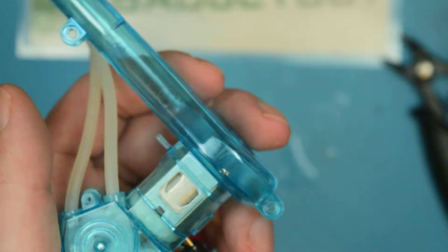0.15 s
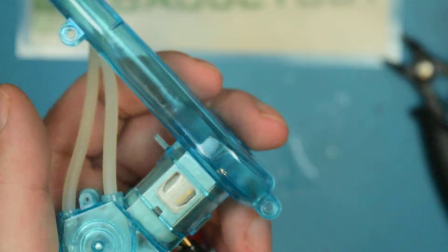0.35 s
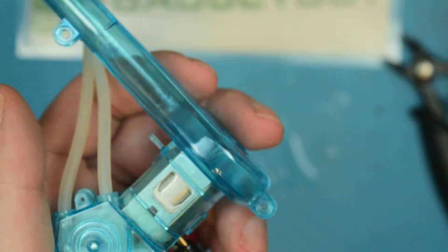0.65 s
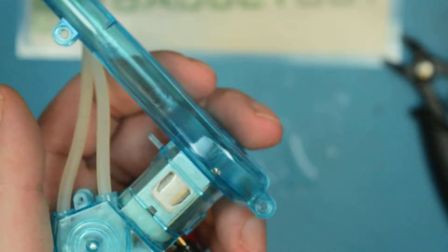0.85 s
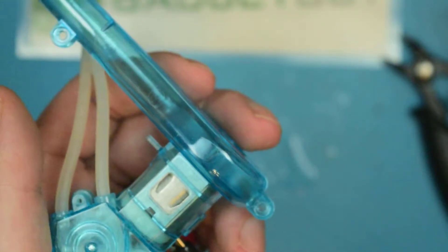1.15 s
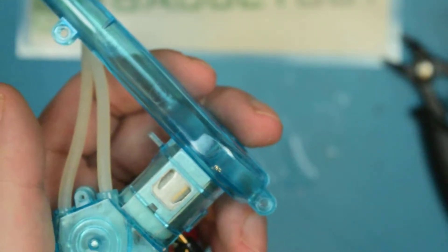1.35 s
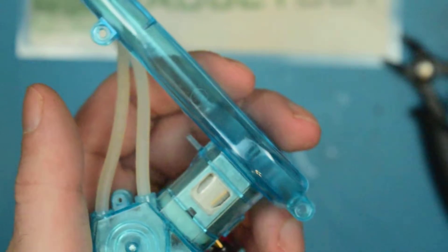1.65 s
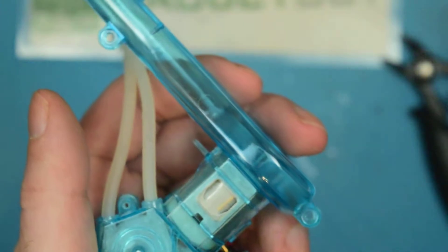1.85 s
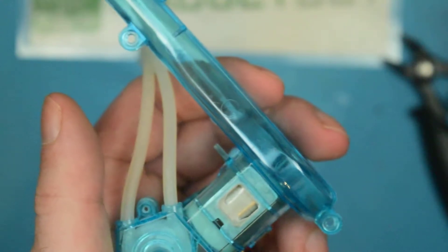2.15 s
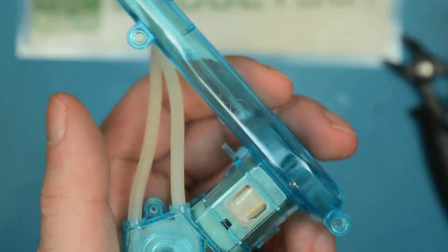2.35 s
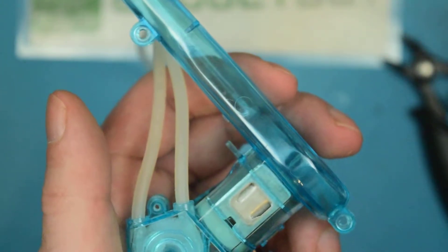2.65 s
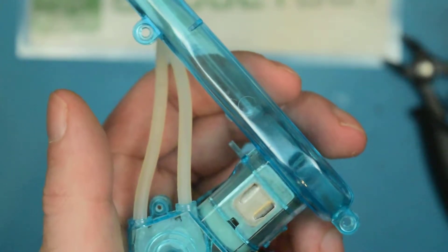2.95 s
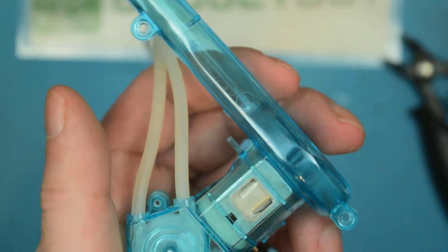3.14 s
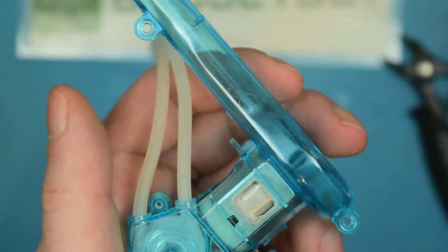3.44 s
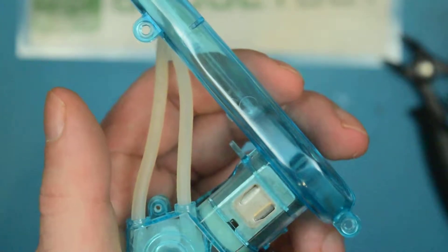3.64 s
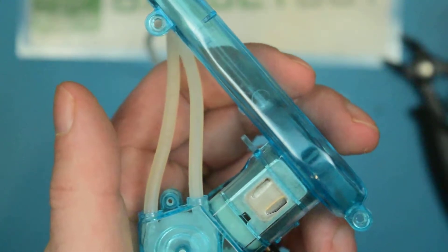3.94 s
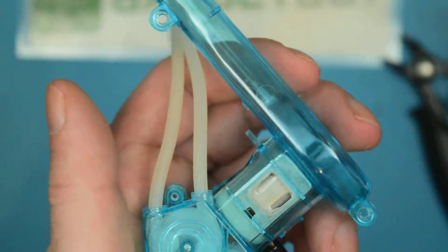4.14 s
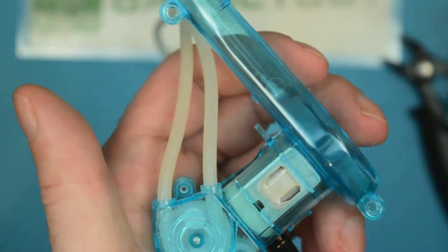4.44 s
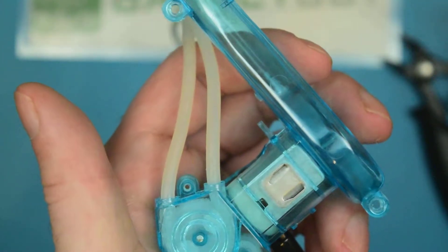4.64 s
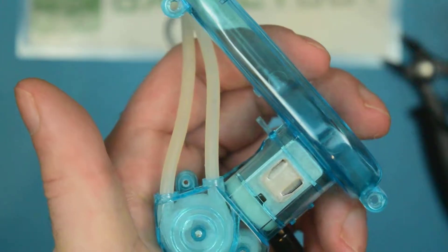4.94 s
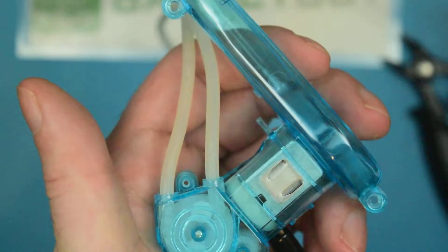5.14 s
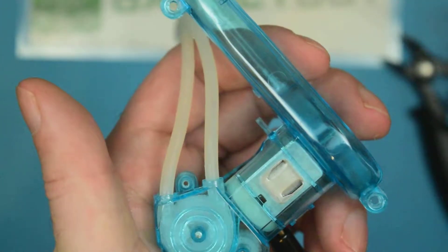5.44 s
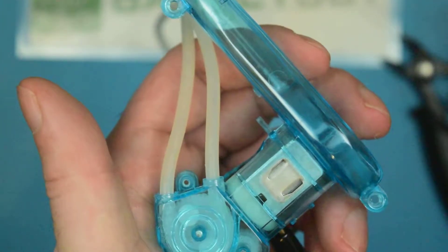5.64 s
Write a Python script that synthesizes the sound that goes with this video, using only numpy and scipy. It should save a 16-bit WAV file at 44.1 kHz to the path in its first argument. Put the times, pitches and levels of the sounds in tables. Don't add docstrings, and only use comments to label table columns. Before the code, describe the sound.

A tiny geared pump motor runs in a hand close to the microphone. It starts slow, spins up quickly, then its whine wavers up and down about once every second or less. Gritty plastic rattle, rapid ticking and bright brush hiss surround it. It runs faster and higher near the end. A faint bench bump comes late, over quiet room rumble in a small, dry workspace.

```python
import sys
import numpy as np
from scipy import signal
from scipy.fft import rfft, irfft, next_fast_len
from scipy.io import wavfile
from scipy.ndimage import uniform_filter1d, map_coordinates

SR = 44100
rng = np.random.default_rng(int(sys.argv[2]) if len(sys.argv) > 2 else 0)


def master_out(mix):
    frames = np.transpose(np.atleast_2d(mix))
    ceiling = np.clip(frames, -1, 1)
    pcm = np.round(ceiling * 32767).astype(np.int16)
    wavfile.write(sys.argv[1], SR, pcm)


def attenuation_scalar(level_db):
    decades = np.asarray(level_db, float) / 20
    return 10 ** decades


N = 255339
T = np.arange(N) / SR

# f/Hz, level/dB [per Hz]
ROOM_RUMBLE = [(15, -64), (25, -38), (46, -10), (69, -5.5), (86, -8.5), (113, -7.5), (257, -3.5), (290, -4),
               (316, -4.5), (945, -12), (1500, -9.5), (1950, -26), (3300, -120)]
# f/Hz, level/dB [rms]
ROOM_HUM = [(59.2, -81.5), (118.4, -79), (161.5, -78.5), (285.3, -75.5)]
# t/s, peak level/dB
BENCH_BUMP = [
    (5.228, -42.5),
    (5.242, -45),
    (5.254, -53),
    (5.27, -49),
]
# f/Hz, width/Hz, level/dB
BENCH_MODES = [(134, 68, -7), (332, 130, -2.5), (618, 70, 0.5), (1090, 290, -9.5)]
# delay/ms, level/dB
REFLECTIONS = [(1.9, -19.5), (3.1, -28), (4.6, -27), (7.3, -14.5), (11, -12.5)]
# middle t/s, length/s, level/dB
LID_CHATTER = [
    (4.84, .07, -55),
    (5.21, 0.092, -48.5),
    (5.67, .05, -51),
]
# f/Hz, width/Hz, level/dB
LID_MODES = [(5850, 350, 0.5), (6560, 500, -1.5), (7100, 300, -6)]
# f/Hz, level/dB [per Hz]
BRUSH_HISS = [(4120, -18), (7000, -4.5), (7530, -6), (8440, -8), (9360, -8.5), (10200, -7.5), (12000, -12),
              (13800, -13), (15600, -15)]
# f/Hz, width/Hz, level/dB
CAN_MODES = [(7320, 190, 11.5), (8130, 130, -8), (8900, 120, -2.5), (10110, 350, 6), (10470, 170, 4.5),
             (13200, 200, 2), (13600, 180, 4.5)]
# t/s, level/dB
CAN_GRIP = [(0, -8), (.3, -2), (1.4, -2.5), (2.3, -4.5), (2.6, -11), (4.5, -6.5), (4.9, -8), (5.3, -1.5),
            (5.5, -11), (5.79, -3)]
# t/s, peak level/dB
KNOCKS = [(0.1411, -43), (0.3495, -37), (0.6792, -37), (0.8102, -26), (0.839, -23.5), (0.869, -25),
          (0.8994, -37), (0.93, -30), (1.043, -32), (1.2506, -38), (1.381, -29), (1.4426, -35),
          (1.838, -40), (1.93, -40), (2.17, -44), (2.45, -25), (2.4783, -32.5), (2.5383, -35), (2.567, -33),
          (2.5958, -29.5), (2.6529, -33), (2.924, -41), (3.142, -41), (3.691, -29), (4.288, -29),
          (4.68, -49), (4.8362, -31), (5.203, -46), (5.2447, -37), (5.669, -33)]
# f/Hz, width/Hz, level/dB
KNOCK_MODES = [(2730, 410, 6), (4266, 110, 16.5), (4950, 300, 7.5), (5350, 230, -12), (6285, 420, -46)]
# f/Hz, width/Hz, level/dB
FLAW_MODES = [(4215, 70, 4), (4850, 70, -3), (5450, 80, -14)]
# t/s, level/dB
FLAW_BITE = [(0, -85), (.15, -52.5), (.9, -50.5), (1.0, -57), (1.1, -49.5), (1.35, -49.5), (1.55, -73),
             (1.88, -64), (1.95, -53), (2.68, -54), (2.8, -70), (2.95, -56), (3.3, -55), (3.45, -65),
             (4.0, -68), (4.2, -52), (4.5, -70), (5.79, -66)]
# f/Hz, width/Hz, level/dB
LOW_MODES = [(1728, 164, 0.5), (2050, 202, 2.5), (2426, 99, -2.5), (2985, 810, -1), (3320, 1020, -3.5)]
# f/Hz, width/Hz, level/dB
HIGH_MODES = [(3580, 400, -5.5), (4150, 750, -2.5), (4950, 406, 0), (5140, 105, 1.5), (5493, 163, -3.5),
              (5970, 340, -5.5), (6310, 225, -4), (6756, 380, -8.5), (8475, 790, -13)]
# t/s, effort level/dB, damping/dB
MOTOR_EFFORT = [(0, -68, -1.5), (.16, -50, -2.5), (.32, -44.5, 1.5), (.75, -45.5, -0.5), (1.02, -48, 0.5),
                (1.34, -46, -2), (1.72, -49, -2), (1.87, -49.5, 0.5), (1.94, -46.5, -0.5), (2.6, -47, 1),
                (3.15, -45.5, -0.5), (3.45, -48.5, 1.5), (3.56, -46, 1), (4.42, -47, 0.5),
                (4.84, -41.5, 0.5), (5.05, -43.5, 6), (5.35, -44, 0), (5.72, -43.5, 3)]
# phase [0 slowest, 1 free, 2 load returns, 3 slowest], low level/dB, high level/dB
SHELL_CYCLE = [(0, -5.5, -5.5), (.5, -6.5, -3), (1, -6, -4), (2, -4.5, -2.5), (2.3, -3.5, -4.5),
               (3, -4.5, -5)]
# slowest t/s, slowest tooth rate f/Hz, free from t/s, free tooth rate f/Hz, load returns t/s
PUMP_STROKES = [(0, 600, .35, 1300, .51), (.916, 975, 1.09, 1135, 1.296), (1.454, 928, 1.558, 936, 1.664),
                (1.69, 930, 1.894, 1208, 2.1), (2.52, 958, 2.726, 1166, 2.904),
                (3.24, 962, 3.502, 1204, 3.684), (4.118, 922, 4.47, 1239, 4.56),
                (4.67, 1181, 5.02, 1582, 5.135), (5.495, 1204, 5.69, 1428, 5.8)]
# tooth rate f/Hz, first level/dB, second level/dB, third level/dB
MESH_RADIATION = [(530, -101, -96, -85), (800, -92, -76, -72), (940, -89, -52, -53), (1030, -86, -49, -53),
                  (1080, -85, -57, -55), (1120, -84, -63, -58), (1185, -76, -62, -56),
                  (1205, -73, -61, -52), (1320, -62, -61, -52), (1430, -64, -57, -52),
                  (1500, -60, -66, -54), (1580, -55, -68, -49)]
# stroke phase, second level/dB, third level/dB
TOOTH_SINGING = [(0, -7, 1), (.5, -8, -1), (.85, -5, -7), (1, -3, 0), (2, -3, 0), (2.15, 0, -4),
                 (2.45, 2, -1), (3, -7, 1)]
# t/s, level/dB
TOOTH_PRESSURE = [(0, -10), (.2, -7), (.3, 7), (.4, 0.5), (.62, -8), (.8, -1), (1.15, 0), (1.35, -2.5),
                  (1.55, 4.5), (1.68, -4.5), (2.1, -1), (2.85, 0), (3.2, 0), (4.1, -1), (4.35, -2.5),
                  (4.8, 0.5), (5.4, -1.5), (5.79, 0)]
# multiple of tooth rate, level/dB
TRAIN_TONES = [(1.25, -68.5), (1.354, -75), (1.462, -68), (1.6, -79), (1.67, -70), (1.78, -67.5),
               (1.87, -77), (1.975, -78), (2.302, -86), (2.4, -81), (2.6, -66.5), (3.199, -70)]

TEETH = 28.65
FLAW_AT = .85
SAG_POWER, INERTIA_S = 1.6, .06
BRUSH_DB, BRUSH_FOLLOWS, USUAL_DB = -60, 0.53, -45.5
REGRIP_S, REGRIP_LASTS_S, REGRIP_DB = 4.2, .25, 6


def unit(x):
    return x / np.sqrt(np.mean(x ** 2) + 1e-20)


def by(x, rows):
    at, *cols = np.transpose(rows)
    return [np.interp(x, at, c) for c in cols]


def wobble(rate):
    return map_coordinates(rng.standard_normal(int(N * rate / SR) + 4), [T * rate])


def filtered(x, response):
    m = next_fast_len(N + SR // 4)
    return irfft(rfft(x, m) * response(np.fft.rfftfreq(m, 1 / SR)), m)[..., :N]


def modes(table):
    def response(f):
        total = 0
        for k, (centre, width, db) in enumerate(table):
            damping = 1j * f * width
            total = total + (-1) ** k * attenuation_scalar(db) * damping / (centre * centre - f * f + damping)
        return total
    return response


def shape(points):
    hz, db = np.transpose(points)
    return lambda f: attenuation_scalar(np.interp(np.log(f + 1), np.log(hz), db))


def steep(edge_hz):
    return lambda f: (1j * f / edge_hz / (1 + 1j * f / edge_hz)) ** 6


def shell(table, edge_hz):
    return lambda f: modes(table)(f) * steep(edge_hz)(f)


def bursts(turns, at, sharp):
    return np.exp(sharp * (np.cos(2 * np.pi * (turns - at)) - 1))


def worn(turns, wear, size):
    pattern = rng.standard_normal((64, size))
    return unit(map_coordinates(pattern, [T * wear, turns % 1 * (size - 1)], order=1))


def room():
    hum = 0
    for hz, db in ROOM_HUM:
        level = attenuation_scalar(db + 3 + 0.46 * wobble(5.4))
        hum = hum + level * np.sin(2 * np.pi * hz * T + .5 * wobble(8))
    return hum + attenuation_scalar(-66.5) * unit(filtered(rng.standard_normal(N), shape(ROOM_RUMBLE)))


def bump():
    blows, t = np.zeros(N + SR), np.arange(SR // 8) / SR
    for s, db in BENCH_BUMP:
        envelope = attenuation_scalar(db - 60 * t / .07) * np.minimum(t / .004, 1)
        blows[round(s * SR):][:len(t)] += envelope * rng.standard_normal(len(t))
    rung = filtered(blows[:N], modes(BENCH_MODES))
    return attenuation_scalar(17) * filtered(rung, shape([(1100, 3), (2000, -30)]))


def nearby(x):
    def comb(f):
        return 1 + sum(attenuation_scalar(db) * np.exp(-2j * np.pi * f * ms / 1000) for ms, db in REFLECTIONS)
    return filtered(x, comb) / np.sqrt(1 + sum(attenuation_scalar(2 * db) for _, db in REFLECTIONS))


def stroke():
    slow_s, slow_hz, free_s, free_hz, load_s = np.transpose(PUMP_STROKES)
    corners = np.ravel([slow_s, free_s, load_s], "F")
    phase = np.interp(T, corners, np.arange(len(corners)))
    k, part = (phase // 3).astype(int), phase % 3
    climb = slow_hz[k] + (free_hz - slow_hz)[k] * np.minimum(part, 1)
    fall_hz = (free_hz - np.roll(slow_hz, -1))[k]
    sag = fall_hz * (1 - (3 - np.maximum(part, 2)) ** SAG_POWER)
    return uniform_filter1d(climb - sag, size=round(INERTIA_S * SR), mode="nearest"), part


def large_wheel():
    return np.cumsum(stroke()[0]) / SR / TEETH


def flawed_wheel(turns):
    s = np.transpose(KNOCKS)[0]
    offset = (FLAW_AT - np.interp(s, T, turns) + .5) % 1 - .5
    return turns + np.interp(T, s, np.unwrap(offset, period=1))


def loudness():
    effort_db, damping_db = by(T, MOTOR_EFFORT)
    low_db, high_db = by(stroke()[1], SHELL_CYCLE)
    brush_db = BRUSH_DB + BRUSH_FOLLOWS * (effort_db - USUAL_DB)
    return effort_db + low_db - damping_db, effort_db + high_db, brush_db, by(T, FLAW_BITE)[0]


def lid():
    wheel = flawed_wheel(large_wheel())
    blows = bursts(wheel, at=0.91, sharp=4.1) * rng.standard_normal(N)
    pushed = sum(attenuation_scalar(db) * np.exp(-((T - s) / length) ** 2) for s, length, db in LID_CHATTER)
    return pushed * unit(filtered(blows, modes(LID_MODES)))


def brushes():
    shaft = 3 * large_wheel()
    scrape = rng.standard_normal(N) + .3 * worn(shaft, wear=8, size=280)
    chop = 1 + .5 * bursts(shaft, at=0.073, sharp=1)
    chop = chop + 2.3 * bursts(2 * shaft, at=0.16, sharp=5.7)
    chop = chop + .5 * bursts(4 * shaft, at=0.14, sharp=3.8)
    hiss = unit(filtered(chop * scrape, shape(BRUSH_HISS)))
    ring = unit(filtered(chop * rng.standard_normal(N), shell(CAN_MODES, 5000)))
    return attenuation_scalar(loudness()[2] + 2.0) * (hiss + attenuation_scalar(by(T, CAN_GRIP)[0]) * ring)


def ticks():
    blows, t = np.zeros(N + SR), np.arange(200) / SR
    for s, db in KNOCKS:
        blows[round(s * SR):][:len(t)] += attenuation_scalar(db - 60 * t / 0.0031) * unit(rng.standard_normal(len(t)))
    return attenuation_scalar(2.0) * filtered(blows[:N], modes(KNOCK_MODES))


def rattle(turns, wheel_share, shaft_share, grain_db):
    grit = rng.standard_normal(N) * attenuation_scalar(grain_db * wobble(600))
    wheel_flaws = wheel_share * worn(turns, wear=4, size=700)
    shaft_flaws = shaft_share * worn(3 * turns, wear=9, size=240)
    return wheel_flaws + shaft_flaws + unit(grit)


def gears():
    low_db, high_db, _, flaw_db = loudness()
    turns = large_wheel()
    wheel = flawed_wheel(turns)
    low = rattle(turns, wheel_share=1.2, shaft_share=.8, grain_db=2.5)
    low = low * (1 + 0.82 * bursts(wheel, at=0.76, sharp=2.5))
    low = unit(filtered(low, shell(LOW_MODES, 1000)))
    high = rattle(turns, wheel_share=.8, shaft_share=.35, grain_db=2.5)
    once = 0.9 * bursts(wheel, at=0.89, sharp=1.7)
    thrice = 0.47 * bursts(3 * wheel, at=0.42, sharp=1.4)
    high = unit(filtered(high * (1 + once + thrice), shell(HIGH_MODES, 1500)))
    flaw = bursts(wheel, at=FLAW_AT, sharp=30000) * attenuation_scalar(1.5 * wobble(40))
    flaw = filtered(flaw, modes(FLAW_MODES))
    flaw = filtered(flaw, modes([(4190, 110, 0), (4870, 150, 0), (5450, 410, 0)]))
    flaw_db = uniform_filter1d(flaw_db, size=SR // 12) - 5.0
    return attenuation_scalar(low_db) * low + attenuation_scalar(high_db) * high + attenuation_scalar(flaw_db) * unit(flaw)


def mesh_lines():
    rate, part = stroke()
    first_db, second_db, third_db = by(rate, MESH_RADIATION)
    sing_second_db, sing_third_db = by(part, TOOTH_SINGING)
    press_db = by(T, TOOTH_PRESSURE)[0]
    turned = np.clip((T - REGRIP_S) / REGRIP_LASTS_S, 0, 1)
    second_db = second_db + (1 - turned) * sing_second_db + turned * REGRIP_DB + press_db
    return rate, third_db + sing_third_db + press_db, second_db, first_db


def whine():
    rate, third_db, second_db, first_db = mesh_lines()
    mesh = np.cumsum(rate) / SR
    turns = mesh / TEETH
    third_db = uniform_filter1d(third_db, size=SR // 30)
    swing = mesh + .045 * np.sin(2 * np.pi * turns) + .033 * wobble(150)
    press = attenuation_scalar(3 * np.cos(2 * np.pi * turns) + 2 * wobble(60))
    third = attenuation_scalar(third_db + 2) * press * np.sin(2 * np.pi * (3 * swing + .095 * wobble(250)))
    second_swing = mesh + 0.35 * (swing - mesh)
    second = attenuation_scalar(second_db - 1) * press ** .7 * np.sin(2 * np.pi * 2 * second_swing)
    first = attenuation_scalar(first_db - 0.5 + 4.7 * np.cos(2 * np.pi * turns)) * np.sin(2 * np.pi * swing)
    first = first + attenuation_scalar(first_db - 4 + 3 * wobble(8)) * np.sin(2 * np.pi * 1.045 * mesh)
    ninth = attenuation_scalar(first_db - 10) * np.sin(2 * np.pi * (9 * swing + .1 * wobble(400)))
    steady = mesh + .013 * wobble(80)
    tones = sum(attenuation_scalar(db + 1.46 * wobble(6)) * np.sin(2 * np.pi * k * steady) for k, db in TRAIN_TONES)
    tones = tones * attenuation_scalar(loudness()[0] + 55 + 25 * np.log10(rate / 1150))
    tones = filtered(tones, lambda f: steep(1100)(f) * (1 + modes([(1950, 500, 6)])(f)))
    return ninth + third + second + first + tones


def scene():
    housing = nearby(gears() + ticks() + brushes() + lid())
    mono = whine() + housing + bump() + room()
    return np.array([mono, mono])


def low_pass(x):
    return signal.sosfilt(signal.butter(12, 15720, fs=SR, output="sos"), x)


def record(dry):
    hiss_shape = shape([(25, -6), (100, 8.5), (1000, 3), (5000, -12.0), (15000, 4.5)])
    hiss = filtered(rng.standard_normal((2, N)), hiss_shape)
    limited = filtered(dry + attenuation_scalar(-70) * hiss, lambda f: f < 15740)
    return low_pass(limited)


dry = scene()
out = record(dry)
master_out(out)
```